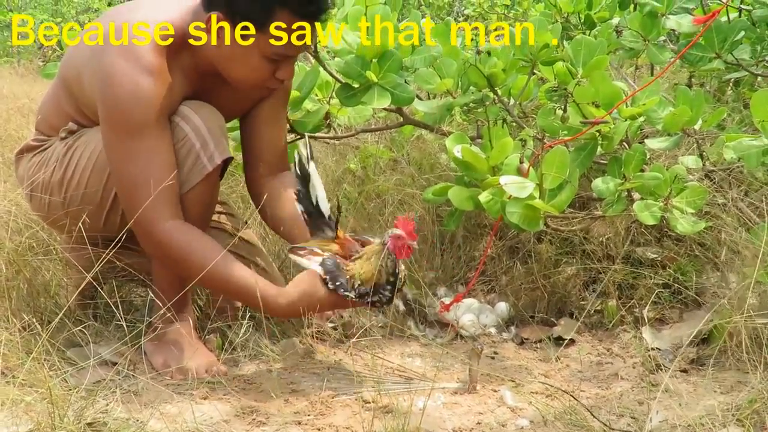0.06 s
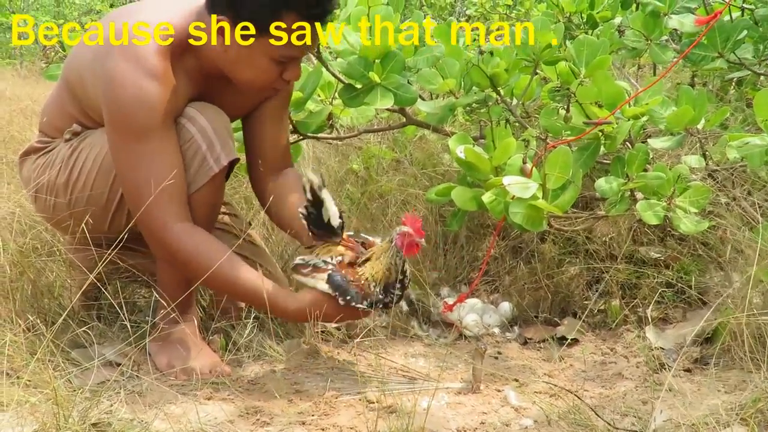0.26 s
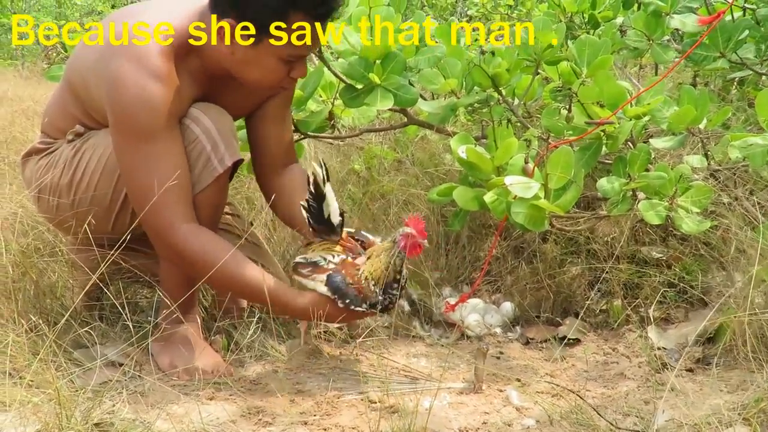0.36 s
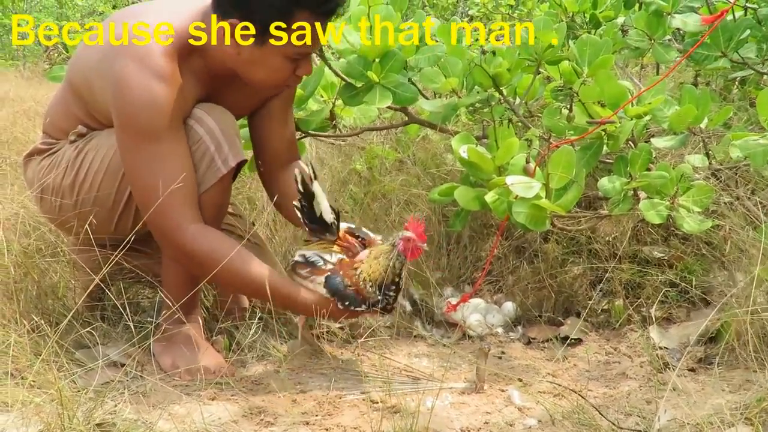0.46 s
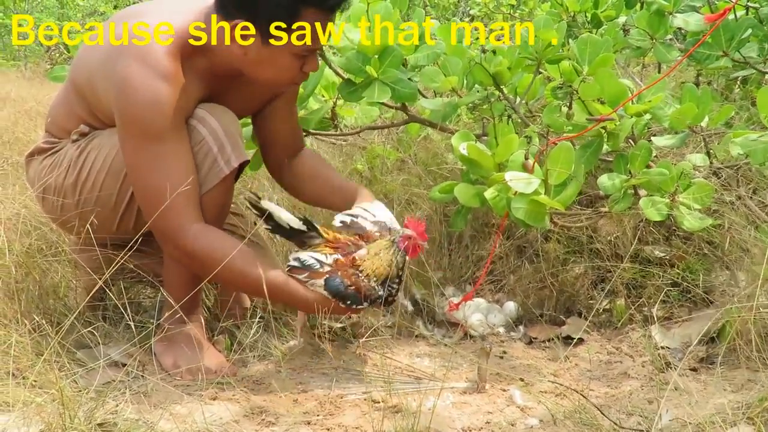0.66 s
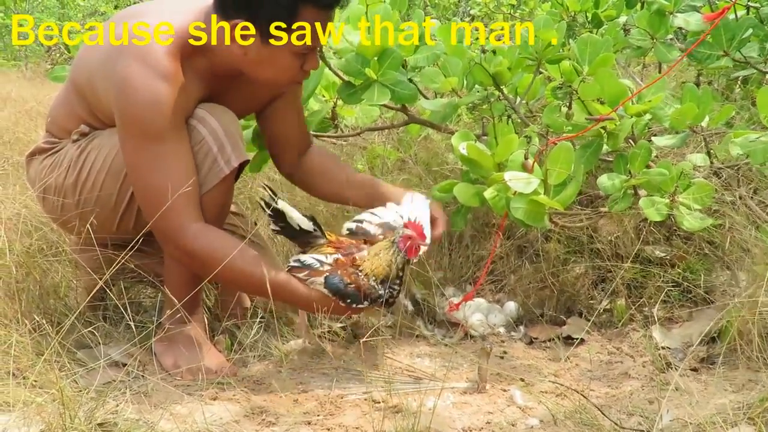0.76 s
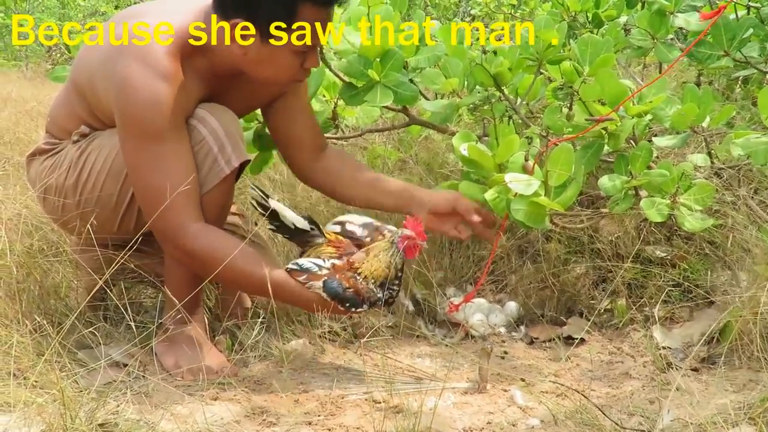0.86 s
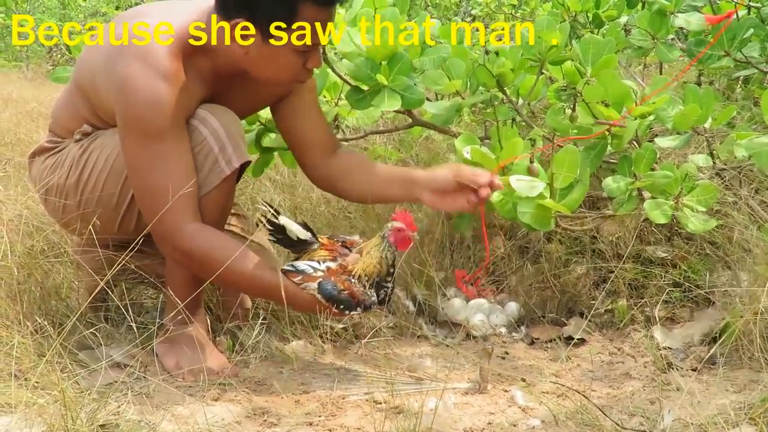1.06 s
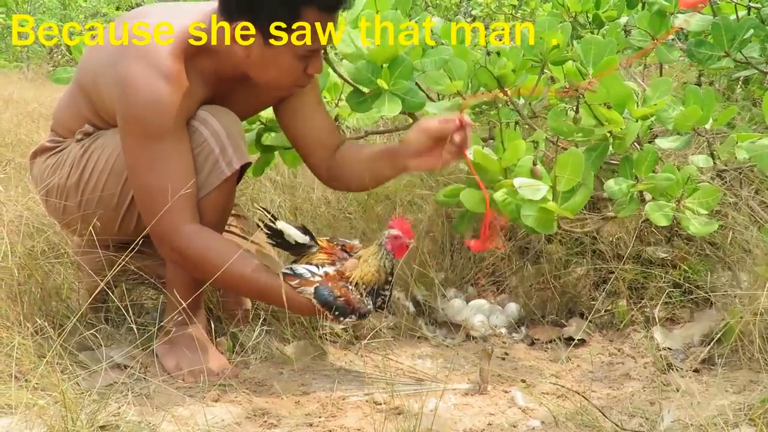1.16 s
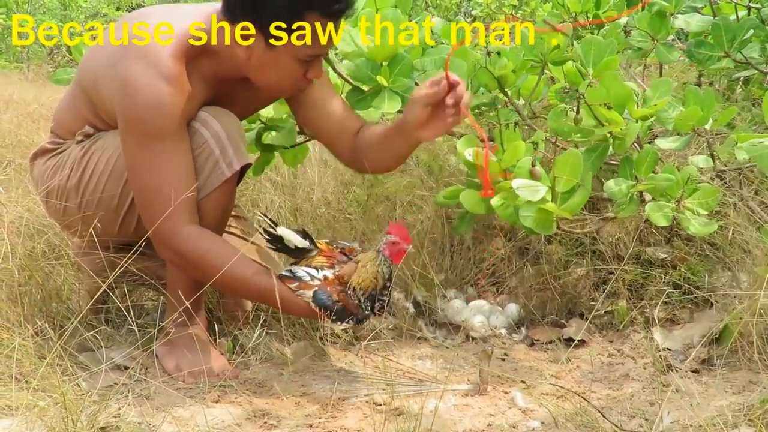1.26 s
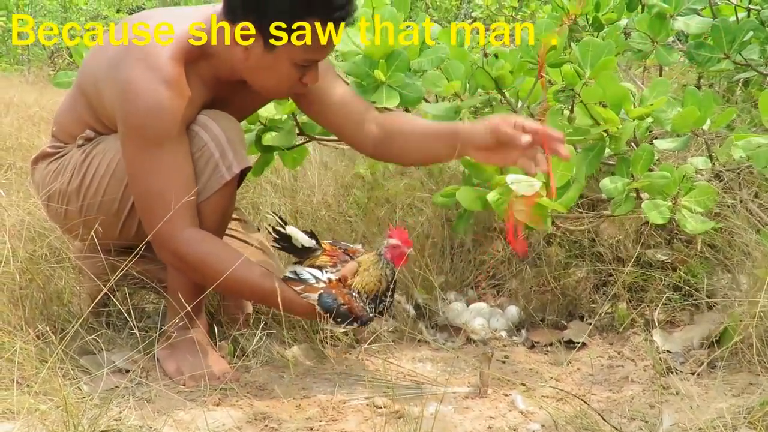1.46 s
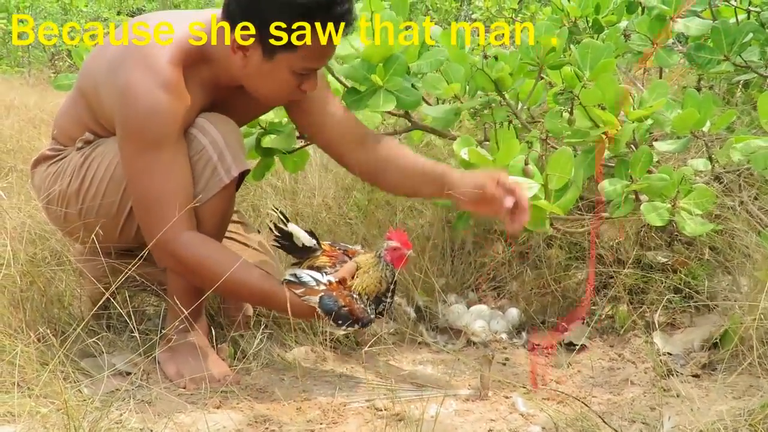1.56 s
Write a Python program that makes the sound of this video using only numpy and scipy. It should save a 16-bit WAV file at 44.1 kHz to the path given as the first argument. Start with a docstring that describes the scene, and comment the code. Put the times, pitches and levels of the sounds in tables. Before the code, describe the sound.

A rooster held close squawks once, turning hoarse, then gives a very short rough cluck cracking upwards. Two clusters of dull microphone thumps follow, with dry leaves rustling and snapping, over soft open-air hiss.

```python
"""Rooster in the hand, outdoors

A rooster held in the hand gives one clear squawk that ends hoarse, and a short rough cluck that cracks upwards:
pulse trains ring in a modelled throat, with air noise and weak echoes from ground and bushes.
Two clusters of dull thumps, most likely the microphone being handled, are short swelling cycles over a rumble.
Dry grass and leaves rustle as grainy noise with ringing snaps. Behind lie a soft outdoor hiss of shaped noise,
a faint hum of wavering tones and one far chirp."""
import sys
import numpy as np
from scipy import signal
from scipy.fft import rfft, irfft
from scipy.io import wavfile

SR = 44100
rng = np.random.default_rng(int(sys.argv[2]) if len(sys.argv) > 2 else 0)


def unload_wav(signal):
    """Save mono or channel-first audio to the path in sys.argv[1] as 16-bit WAV at rate SR, clipped to [-1, 1]."""
    wavfile.write(
        sys.argv[1],
        SR,
        np.round(np.clip(np.atleast_2d(signal).T, -1, 1) * 32767).astype(np.int16),
    )


N = 70560  # samples, 1.6 s

# the throat's resonances: (frequency [Hz], relative level [dB])
THROAT = [(200, -42.5), (400, 5), (540, -5.5), (800, -4.5), (1070, 3.5), (1250, -2.5), (1500, 1),
          (1640, -0.5), (1850, -21), (2170, -18), (2720, -35), (3300, -33), (3800, -27.5), (4400, -47.5),
          (7500, -50.5), (12000, -83.5)]


def from_db(db):
    """Decibels to gain."""
    return 10 ** (np.asarray(db) / 20)


def rms_one(x):
    """Scale to unit power."""
    return x / np.sqrt(np.mean(x ** 2) + 1e-20)


def clock():
    """Time of every sample in seconds."""
    return np.arange(N) / SR


def rfft_hz():
    """Frequency of every spectral bin."""
    return np.arange(N // 2 + 1) * SR / N


def level_curve(rows):
    """Gain in time from rows that start with seconds and end with dB; practically silent outside them."""
    rows = np.array(rows)
    level_db = np.interp(clock(), rows[:, 0], rows[:, -1], left=-150, right=-150)
    return from_db(level_db)


def at_hz(points, hz):
    """Read a table on a log-frequency axis."""
    table_hz, value = np.transpose(points)
    return np.interp(np.log(hz), np.log(table_hz), value)


def drift(rate_hz):
    """Smooth random wander with spread 1: white noise through two equal one-pole lowpasses."""
    pole = np.exp(-2 * np.pi * rate_hz / SR)
    noise = rng.standard_normal(N + SR)
    smooth = signal.lfilter([1], [1, -2 * pole, pole * pole], noise)
    return rms_one(smooth[SR:])  # the first second lets the filter settle


def coloured(spectrum):
    """Noise of the given spectrum above 20 Hz, rms 1."""
    hz = np.maximum(rfft_hz(), 1)
    gains = from_db(at_hz(spectrum, hz)) * (hz > 20)
    return rms_one(irfft(rfft(rng.standard_normal(N)) * gains, N))


def stereo_noise(spectrum, likeness):
    """Coloured noise whose two sides are alike by one number, or by one per frequency."""
    alike = np.clip(likeness, -1, 1)
    mid = irfft(rfft(coloured(spectrum)) * np.sqrt((1 + alike) / 2), N)
    side = irfft(rfft(coloured(spectrum)) * np.sqrt((1 - alike) / 2), N)
    return np.array([mid + side, mid - side])


def background(flutter_db):
    """Soft outdoor hiss of slightly fluttering noise, and a faint hum of tones wavering in pitch and level."""
    # air spectrum: (frequency [Hz], relative level [dB per Hz])
    air_spectrum = [(25, 11.5), (62, -9.5), (110, -2.5), (200, 1.5), (360, 4), (520, -1), (660, 3),
                    (780, -6.5), (1050, -4.5), (2000, -10), (3500, -16), (7000, -26), (10000, -31.5),
                    (15000, -39.5)]
    # likeness of left and right: (frequency [Hz], likeness [-1 to 1])
    air_likeness = [(40, 0.81), (100, 0.91), (170, -0.51), (380, -0.64), (700, -0.091), (1200, 0.24),
                    (2200, 0.48), (4000, 0.15), (12000, -0.045)]
    # hum tones: (frequency [Hz], level [dB])
    hum_tones = [(408, -67.5), (662, -64)]
    air_db = -49
    pitch_wander = 0.0076  # share of the hum's pitch
    likeness = at_hz(air_likeness, np.maximum(rfft_hz(), 1))
    out = from_db(air_db + flutter_db * drift(14)) * stereo_noise(air_spectrum, likeness)
    for hz, db in hum_tones:
        phase = 2 * np.pi * hz * np.cumsum(1 + pitch_wander * drift(30)) / SR
        out = out + from_db(db + 2 * drift(11.0)) * rms_one(np.sin(phase))
    return out


def rumble():
    """Low rumble around the thumps: deep noise whose level swells with the two clusters."""
    # level in time: (time [s], level [dB])
    rumble_level = [(0, -65), (.68, -63), (.78, -55), (.85, -49.5), (.9, -28), (.97, -36), (1.06, -46),
                    (1.1, -52.5), (1.16, -48), (1.24, -44), (1.3, -27), (1.35, -43.5), (1.43, -51),
                    (1.47, -46), (1.6, -56)]
    # spectrum: (frequency [Hz], relative level [dB per Hz])
    rumble_spectrum = [(25, -9), (60, 8), (90, 2.5), (170, -2), (260, -11), (400, -26.5), (800, -62.5)]
    return level_curve(rumble_level) * stereo_noise(rumble_spectrum, likeness=0.26)


def far_chirp():
    """A thin, faint whistle from far away: a steady sine under a bell-shaped swell."""
    # chirps: (time of the peak [s], time from peak to 1/e [s], pitch [Hz], level [dB])
    chirp_rows = [(0.062, 0.015, 5400, -66.5)]
    t = clock()
    out = 0
    for s, length, hz, db in chirp_rows:
        swell = np.exp(-((t - s) / length) ** 2)
        out = out + from_db(db) * swell * np.sin(2 * np.pi * hz * t)
    return out


def throat_phase(hz):
    """Minimum phase of the throat's resonances at each frequency, so that it rings after every pulse."""
    grid = np.maximum(rfft_hz(), 1)
    cepstrum = irfft(np.log(from_db(at_hz(THROAT, grid))), N)
    return np.interp(hz, grid, 2 * rfft(cepstrum[:N // 2], N).imag)


def call(rows, gain_db, tilt_db):
    """The syrinx's pulses ring in the throat; roughness unsettles them and adds air. Tilt is in dB per octave."""
    # air noise at the beak: (frequency [Hz], relative level [dB per Hz])
    rasp_spectrum = [(250, -64), (500, -24), (1100, 5.5), (1700, 0), (2600, -15), (3600, -15.5),
                     (4600, -30), (7500, -24), (13000, -61.5)]
    # thin hiss through the open beak: (frequency [Hz], relative level [dB per Hz])
    hiss_spectrum = [(2500, -30.5), (4500, 3), (8000, -3.5), (12000, -31)]
    # at full roughness: wavering shares of pitch and strength, unevenness of alternate pulses, air noise
    jitter, shimmer, alternation, rasp_db = 0.086, 0.93, 0.57, -11
    hiss_db = -43.5  # against the voice, before the beak's treble
    beak_hz = 2380  # the beak's opening changes the treble above this
    # the resonances follow a share of the pitch glide; the throat table holds at the rest pitch
    throat_rest_hz, throat_follows = 541, 0.36

    s, *columns = np.transpose(rows)
    hz, rough, beak_db, _ = [np.interp(clock(), s, column) for column in columns]
    pitch = hz * (1 + jitter * rough * drift(336))
    phase = 2 * np.pi * np.cumsum(pitch) / SR

    orders = np.arange(1, 19)[:, None]
    partials = orders * pitch
    in_throat = partials * (throat_rest_hz / hz) ** throat_follows
    beak_treble_db = beak_db / (1 + (beak_hz / partials) ** 10)
    gains = from_db(at_hz(THROAT, in_throat) + tilt_db * np.log2(orders) + beak_treble_db)
    ringing = (gains * np.cos(orders * phase + throat_phase(in_throat))).sum(0)
    voice = ringing / np.sqrt((gains ** 2).sum(0) / 2)  # even power before the level curve

    # half the phase turns over once in two pulses
    uneven = 1 + rough * (shimmer * drift(243) + alternation * np.cos(phase / 2))
    rasp = from_db(rasp_db) * coloured(rasp_spectrum) * rough * (1 + np.cos(phase))
    hiss = from_db(hiss_db + beak_db) * coloured(hiss_spectrum)
    return from_db(gain_db) * level_curve(rows) * (voice * uneven + rasp + hiss)


def rooster():
    """A clean squawk, a rougher cluck and its break; ground and bushes throw them back as weak echoes."""
    # calls: (time [s], pitch [Hz], roughness [0-1], treble as the beak opens [dB], relative level [dB])
    squawk_rows = [(.2215, 585, .2, -16, -56), (.2248, 550, .15, -16, -27.5), (.2275, 510, .08, -16, -26),
                   (.234, 525, .05, -11, -23), (.247, 541, .06, 0, -21.4), (.257, 548, .11, 1, -21.2),
                   (.263, 553, .22, -2, -22.8), (.267, 625, .45, -6, -27), (.270, 605, .55, -6, -28.5),
                   (.274, 640, .6, -4, -37.5), (.283, 620, .7, -2, -55)]
    cluck_rows = [(.476, 590, .3, -12, -57), (.4845, 545, .2, -12, -43), (.4865, 508, .15, -10, -25.5),
                  (.491, 514, .2, -6, -26), (.4945, 580, .32, 0, -25), (.4975, 600, .8, 6, -33.5),
                  (.500, 540, 1, 7, -38.5), (.504, 500, 1, 6, -40), (.509, 480, .8, 1, -47),
                  (.518, 480, .7, 0, -58)]
    # the voice breaks to a higher note as the cluck ends: same columns
    break_rows = [(.497, 900, .5, 0, -50), (.501, 835, .5, 0, -36), (.504, 805, .35, 0, -38.5),
                  (.508, 790, .2, 0, -36), (.513, 785, .3, 0, -48), (.524, 780, .3, 0, -60)]
    # echoes: (delay [s], level against the voice [dB])
    echo_rows = [(.017, -22.5), (.031, -27), (.052, -30), (.083, -34)]
    voice = call(squawk_rows, gain_db=0.0, tilt_db=1.3)
    voice = voice + call(cluck_rows, gain_db=-1.5, tilt_db=-2.0)
    voice = voice + call(break_rows, gain_db=-1.0, tilt_db=-14)
    out = np.array([voice, voice])
    for k, (delay, db) in enumerate(echo_rows):
        out[k % 2] += from_db(db) * np.interp(clock() - delay, clock(), voice)  # left and right in turn
    return out


def undergrowth(grain_db):
    """Grainy brushing of dry blades, and snaps of twigs and leaves that ring briefly at their own pitch."""
    # brushing in time: (time [s], level [dB])
    brush_level = [(.8, -79), (.92, -67.5), (.995, -58), (1.055, -66), (1.09, -59), (1.14, -65),
                   (1.185, -55.5), (1.215, -65.5), (1.243, -67), (1.257, -50), (1.268, -56), (1.28, -56.5),
                   (1.305, -66.5), (1.35, -61), (1.41, -86)]
    # brushing spectrum: (frequency [Hz], relative level [dB per Hz])
    brush_spectrum = [(500, -33), (1500, 1), (4000, 5.5), (7000, 1.5), (10000, -4), (13000, -4),
                      (15000, -15)]
    # snaps: (time [s], level [dB], time to fall 60 dB [s], pitch [Hz])
    snap_rows = [(0.4, -54.5, 0.28, 1960), (.585, -40, 0.034, 1020), (0.842, -55.5, .11, 3660),
                 (1.13, -48.5, 0.023, 3870), (1.167, -48, .06, 2100), (1.1828, -45, 0.023, 3560),
                 (1.183, -44, 0.053, 2550), (1.191, -43, 0.027, 1960), (1.2247, -38, 0.015, 1920),
                 (1.235, -30.5, 0.0093, 2110), (1.2407, -43, 0.063, 2560), (1.244, -41.5, 0.051, 1800),
                 (1.272, -42.5, 0.072, 2020), (1.286, -46.5, .035, 1710), (1.366, -50, 0.068, 1690)]
    # a snap's resonance: (multiple of its pitch [ratio], relative level [dB])
    twig_resonance = [(.15, -27), (.5, -14), (.75, 9.5), (1, 9.5), (1.3, -3.5), (1.8, -6), (3.5, -17),
                      (7, -48)]
    snap_rise_s = 0.00049
    grain = rms_one(from_db(grain_db * drift(140)))
    out = level_curve(brush_level) * grain * stereo_noise(brush_spectrum, likeness=0.93)
    t = clock()
    for s, db, t60, hz in snap_rows:
        age = np.maximum(t - s, 0)
        rise = 1 - np.exp(-age / snap_rise_s)
        decay = np.exp(-np.log(1000) * age / t60)
        spectrum = [(ratio * hz, level) for ratio, level in twig_resonance]
        out = out + from_db(db) * rise * decay * coloured(spectrum)
    return out


def thump(t, hz):
    """A few cycles sagging in pitch with one overtone, swelling fast and dying a little slower."""
    rise_cycles, fall_cycles, sag = 0.48, 0.93, 0.023
    overtone_ratio, overtone_db = 1.466, -14.5
    cycles = t * hz
    swell = 2 * np.exp(-np.logaddexp(-cycles / rise_cycles, cycles / fall_cycles))
    phase = 2 * np.pi * cycles * (1 - sag * np.tanh(cycles / 2))
    overtone = from_db(overtone_db) * swell * np.cos(overtone_ratio * phase)
    return -swell * (np.cos(phase) + overtone)


def thumps():
    """Thumps on the microphone: each shakes the two sides slightly apart in time, over a deeper boom."""
    # thumps: (time of the peak [s], level [dB], pitch [Hz], lag of the right side [s])
    thump_rows = [(0.718, -50.5, 69, .0002), (.867, -40, 89, .0015), (0.8902, -21.5, 219, .0013),
                  (0.8979, -19, 112, .003), (.9003, -17.5, 253, .0015), (0.9183, -14.5, 220, .0019),
                  (.9183, -26.5, 364, .001), (0.9313, -20, 258, .0017), (0.9438, -20, 92.5, .0032),
                  (0.9505, -15.5, 181, .0022), (0.9992, -19.5, 164, .0022), (1.056, -36.5, 92, .0023),
                  (1.16, -35, 87, .0031), (1.208, -43.5, 70.4, .0015), (1.2739, -15.5, 181, -.0021),
                  (1.2899, -19, 104, -.0019), (1.307, -17.5, 226, -.0017), (1.3211, -17.5, 240.4, .0018),
                  (1.3346, -27, 136, .0033), (1.354, -38, 158, .0014), (1.403, -38, 136, .0007),
                  (1.46, -37.5, 99.6, .0003), (1.507, -42.5, 118, .0005)]
    boom_db, boom_hz, boom_s = -22, 78.5, 0.009  # level against the thump, pitch, time from peak to 1/e
    out = np.zeros((2, N))
    for s, db, hz, lag in thump_rows:
        t = clock() - s
        boom = -from_db(boom_db) * np.exp(-(t / boom_s) ** 2) * np.cos(2 * np.pi * boom_hz * t)
        sides = np.array([thump(t, hz), thump(t - lag, hz)])
        out = out + from_db(db) * (sides + boom)
    return out


def scene():
    """Background, rumble, chirp, bird, grass and thumps together."""
    handling = rumble() + thumps()
    return background(flutter_db=0.33) + far_chirp() + rooster() + undergrowth(grain_db=2) + handling


def record(dry):
    """The deepest bass is thinned without phase shift and the top is cut steeply."""
    low_cut_hz, cutoff_hz = 38.4, 15200
    bass_cut = signal.butter(2, low_cut_hz, "high", fs=SR, output="sos")
    thinned = signal.sosfiltfilt(bass_cut, dry, padtype="even", padlen=N // 2)
    top_cut = signal.ellip(12, .1, 80, cutoff_hz, fs=SR, output="sos")  # 0.1 dB ripple, 80 dB down
    return signal.sosfilt(top_cut, thinned)


dry = scene()
out = record(dry)
unload_wav(out)
```